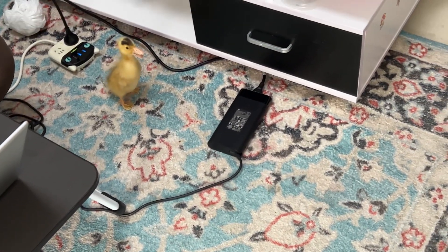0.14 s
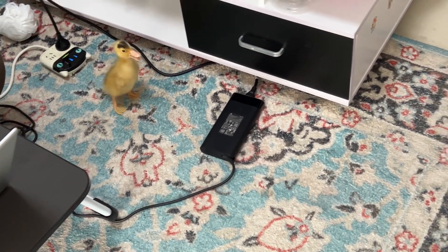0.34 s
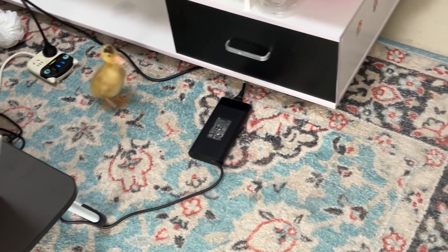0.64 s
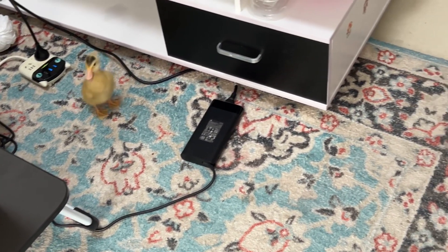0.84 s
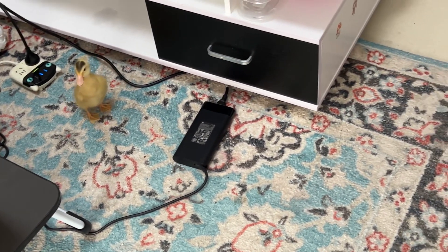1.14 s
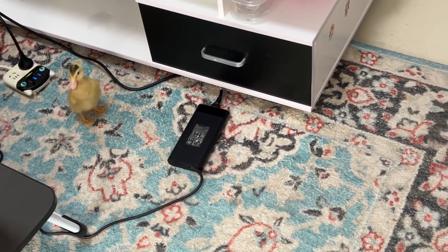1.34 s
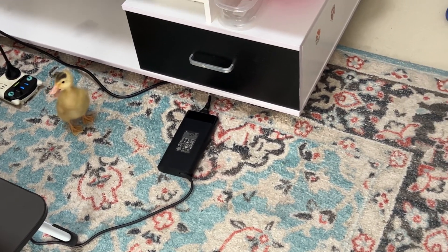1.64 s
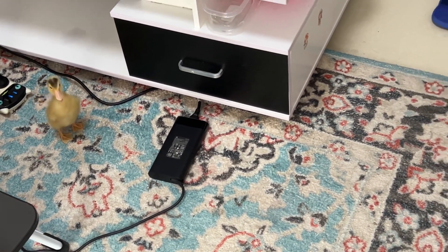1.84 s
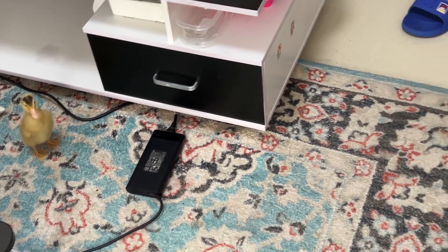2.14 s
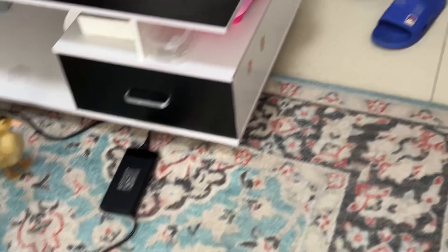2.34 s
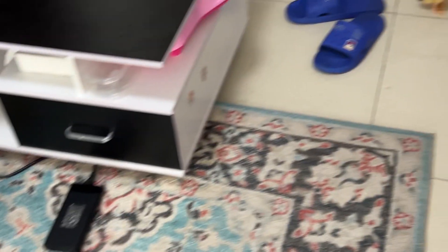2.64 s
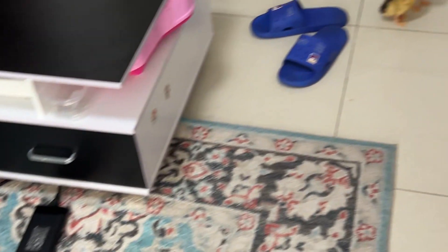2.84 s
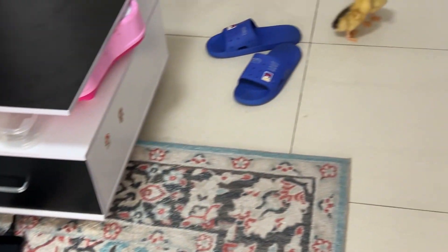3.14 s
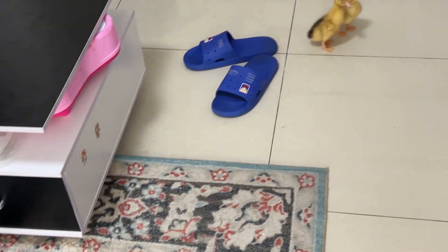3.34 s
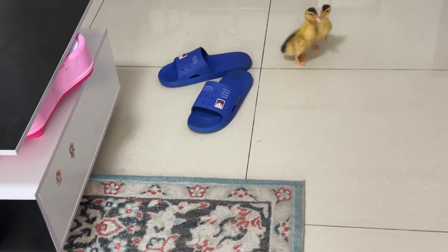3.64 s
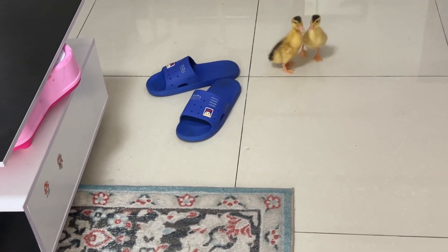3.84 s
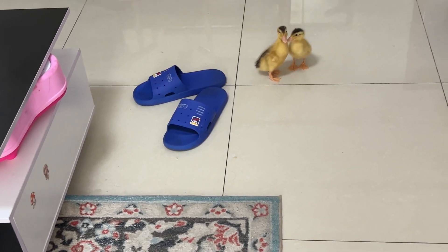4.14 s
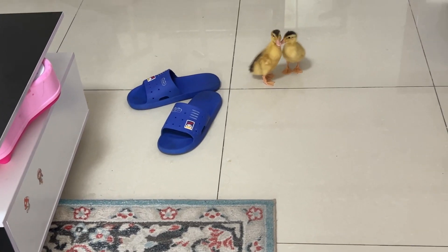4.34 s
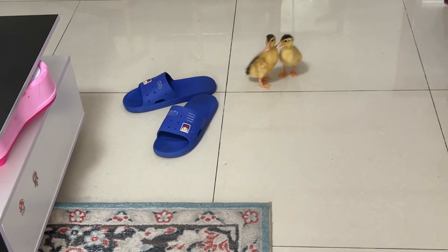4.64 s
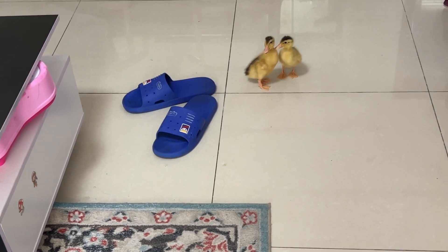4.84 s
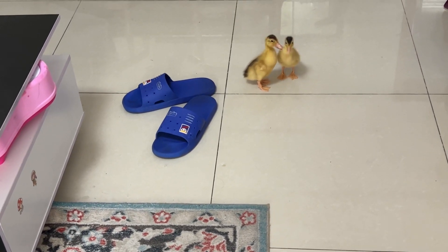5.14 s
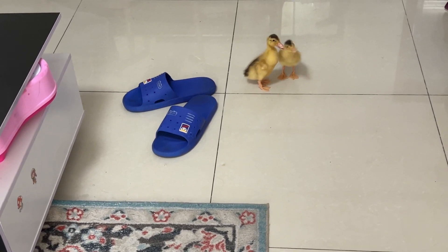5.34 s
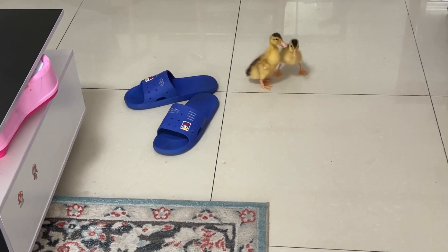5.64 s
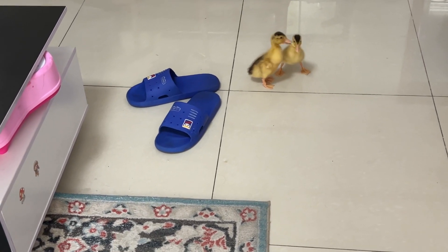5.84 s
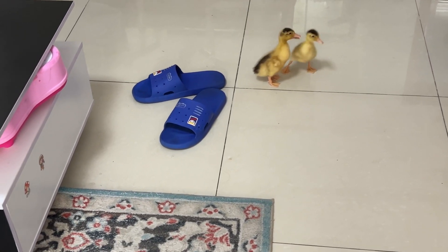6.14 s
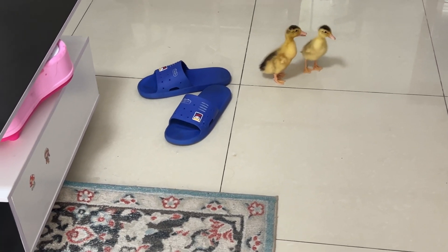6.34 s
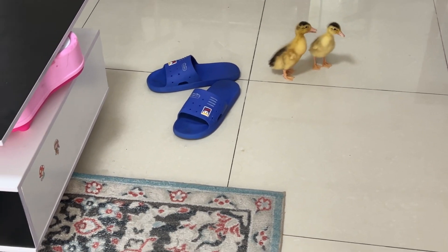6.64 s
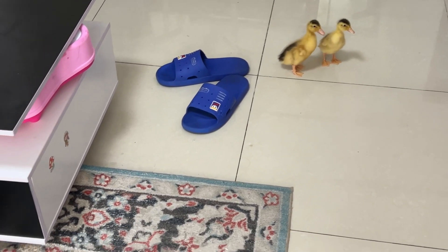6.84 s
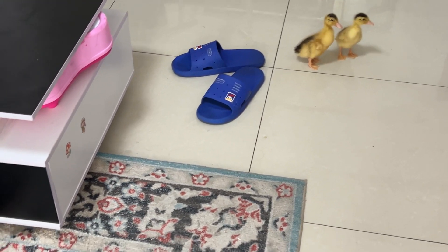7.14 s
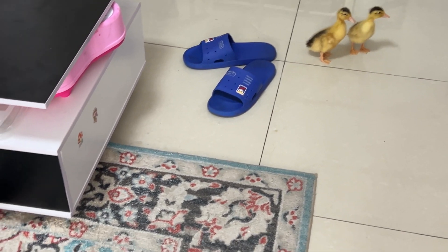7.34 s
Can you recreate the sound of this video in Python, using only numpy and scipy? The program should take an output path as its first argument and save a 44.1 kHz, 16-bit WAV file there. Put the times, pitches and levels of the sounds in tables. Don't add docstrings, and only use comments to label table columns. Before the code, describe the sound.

A quiet living room with a low, soft rumbling hum that swells as the phone is moved. From 0 to 2.8 seconds a near duckling gives separate, piercing peeps of just over a tenth of a second, swooping up, holding near 3.4 kHz, rising, then dropping fast; several crack upward with a rasp, the longest and highest near 2.5. Quiet dipping peeps from another bird fall between them. From 2.9 the farther duckling calls regularly, about four per second, each peep sliding downward with two clashing voices, while the near one alternates until 4.4. From 4.5 to 6.2 only the falling peeps continue; then the near bird returns, flatter at first, interleaving until the far one stops around 6.7. Near peeps close the clip at 7.4. Dull low handling bumps occur near 0.5, 2.4, 2.8 and 3.7 to 4.9, a faint claw scuff at 4.3. Hard surfaces ring for roughly half a second.

```python
import sys
import numpy as np
from scipy import signal
from scipy.fft import rfft, irfft, next_fast_len
from scipy.io import wavfile
from scipy.ndimage import uniform_filter1d

SR = 44100
rng = np.random.default_rng(int(sys.argv[2]) if len(sys.argv) > 2 else 0)


def dump(signal):
    limited = np.clip(np.atleast_2d(signal).T, -1, 1)
    pcm = np.round(limited * 32767).astype(np.int16)
    wavfile.write(sys.argv[1], SR, pcm)


N = 329868
LEAD = SR // 4
PADDED = N + 2 * LEAD


def from_db(db):
    return 10 ** (np.asarray(db) / 20)


def at_hz(points, hz):
    points = np.array(points)
    return np.interp(np.log(np.maximum(hz, 1)), np.log(points[:, 0] + 1), points[:, 1])


def wobble(count, hz):
    r = np.exp(-2 * np.pi * hz / SR)
    slow = signal.lfilter([1], [1, -2 * r, r * r], rng.standard_normal(count + 3000))[3000:]
    return slow / slow.std()


# frequency in Hz, density in dB per Hz.
HUM_SPECTRUM = [(22, -25.5), (45, -1), (100, -3.5), (130, -11.5), (250, -16), (550, -22.5), (750, -29),
                (1050, -26), (1500, -30.5), (2200, -25.5), (2800, -34), (4000, -45), (5000, -57),
                (8000, -91)]
# frequency in Hz, typical peak level in dB.
APPLIANCE_TONES = [(54, -61.5), (196, -74), (240, -77.5), (300, -80), (344, -80), (538, -80.5)]
# frequency in Hz, left-right likeness from -1 to 1.
PORT_LIKENESS = [(60, 0.92), (130, 0.942), (290, 0.65), (640, 0.54), (1410, 0.082), (3100, 0.85),
                 (6820, -0.36), (15000, 0.21)]
# peak time in seconds, lift in dB.
RUMBLE_SWELLS = [
    (.9, 3.5),
    (1.95, 1.5),
    (2.42, 5),
    (2.9, 1.5),
    (3.9, 3.5),
    (4.32, 4),
    (5.7, 2),
    (7.3, 3),
]


def hum():
    hz, t = np.fft.rfftfreq(N, 1 / SR), np.arange(N) / SR
    mid, side = rfft(rng.standard_normal((2, N))) * from_db(at_hz(HUM_SPECTRUM, hz))
    alike = np.clip(at_hz(PORT_LIKENESS, np.minimum(hz, 1400)), -1, 1)
    noise = irfft(np.sqrt(1 + alike) * mid + np.sqrt(1 - alike) * side * [[1], [-1]], N)
    hum_db, swell_s = -67, 0.2246
    swell_db = sum(db * np.exp(-((t - s) / swell_s) ** 2) for s, db in RUMBLE_SWELLS)
    noise *= from_db(hum_db + swell_db + 8.5 + 1.6 * wobble(N, 2.0)) / noise.std()
    flicker_db, drift_hz = 4.5, 4.038
    for tone_hz, db in APPLIANCE_TONES:
        level = from_db(db + flicker_db * wobble(N, 1.9))
        phase = 2 * np.pi * np.cumsum(tone_hz + drift_hz * wobble(N, 4.9)) / SR
        noise = noise + level * np.sin(phase)
    return noise


# start in seconds, peak level in dB.
FINGER_THUDS = [
    (0.47, -54),
    (2.372, -47.5),
    (2.821, -48),
    (3.662, -49),
    (3.986, -53.5),
    (4.374, -48.5),
    (4.873, -52),
]


def thuds():
    out, t = np.zeros(N + SR), np.arange(SR // 5) / SR
    bump = np.sin(2 * np.pi * 62 * t) * (t / 0.00995) * np.exp(-t / 0.018)
    for s, db in FINGER_THUDS:
        out[round(s * SR):][:len(t)] += from_db(db + 8.0) * bump
    return out[:N]


# frequency in Hz, gain in dB.
BEAK_ROOM_COLOUR = [(1400, -4.5), (2200, -11), (3300, -2.5), (4200, -3.5), (5100, -4), (6600, -4.5),
                    (7050, -17.5), (7450, -11.5), (8200, -8), (10000, 2), (11500, 3), (12500, -18),
                    (13300, -2), (15600, -8)]
# frequency in Hz, time to fall 60 dB in seconds.
ROOM_DECAY = [(1500, 0.41), (3400, 0.4532), (6500, 0.3635), (10000, 0.2764), (15000, 0.15)]
# frequency in Hz, radians by which the left leads.
PORT_LEAD = [(0, 0), (600, -0.3), (1460, 1.8), (2670, -0.6), (5080, -0.1), (5430, 2.1), (6370, 2.0),
             (7490, 3.3), (8350, 5.9), (9820, 6.5), (10900, 7.6), (11800, 9.1), (13700, 9.9), (15400, 12.8)]


def living_room(dry, wet_db, own_db):
    size = next_fast_len(len(dry) + SR)
    hz, t = np.fft.rfftfreq(size, 1 / SR), np.arange(SR) / SR
    tail = np.zeros((2, SR))
    for centre in np.geomspace(1500, 15000, 6):
        edges = [centre / 10 ** .1, centre * 10 ** .1]
        band = signal.butter(2, edges, "band", fs=SR, output="sos")
        decay = from_db(-60 * t / at_hz(ROOM_DECAY, centre))
        tail += signal.sosfilt(band, rng.standard_normal((2, SR))) * decay
    tail *= 1 - np.exp(-t / 0.0007)
    shared, own = rfft(tail / np.sqrt(np.sum(tail[0] ** 2)), size)
    side = np.array([[1], [-1]])
    path = 1 + from_db(wet_db) * (shared + from_db(own_db) * own * side)
    ports = from_db(at_hz(BEAK_ROOM_COLOUR, hz)) * np.exp(.5j * side * at_hz(PORT_LEAD, hz))
    return irfft(rfft(dry, size) * path * ports, size)[:, LEAD:LEAD + N]


# start in seconds, peak level in dB.
CLAW_TAPS = [
    (4.292, -45.5),
]


def claw_tap():
    out = np.zeros(PADDED)
    burst = np.exp(-np.arange(3000) / 900)
    for s, db in CLAW_TAPS:
        out[round(s * SR) + LEAD:][:3000] = from_db(db + 9.5) * rng.standard_normal(3000) * burst
    return signal.sosfilt(signal.butter(2, [280, 2600], "band", fs=SR, output="sos"), out)


def whistle(out, knots, overtones_db, rough, opening=0.0044):
    s, hz, db = np.transpose(knots)
    at = np.arange(round(s[0] * SR), round(s[-1] * SR))
    pitch = uniform_filter1d(np.interp(at / SR, s, hz), size=177, mode="nearest")
    pitch *= 1 + 0.0021 * wobble(len(at), 22)
    tremble = 1 + rough * wobble(len(at), 4000 * rough + 230)
    phase = 2 * np.pi * np.cumsum(pitch * tremble) / SR
    opened = np.minimum(1, (at - at[0]) / SR / opening) ** 2
    shutting = np.minimum(1, pitch / 2743) ** 12
    tone = np.sin(phase) * from_db(overtones_db[0])
    for harmonic, overtone_db in enumerate(overtones_db[1:], 2):
        tone += opened * shutting * from_db(overtone_db) * np.sin(harmonic * phase)
    edge = np.minimum(1, np.minimum(at - at[0], at[-1] - at) / 90)
    out[at + LEAD] += np.sqrt(2) * from_db(np.interp(at / SR, s, db)) * edge * tone


def shifted(shape, s, db):
    return [(s + t, hz, db + rel) for t, hz, rel in shape]


# start in seconds, high Hz, low Hz, drop after start in seconds, level in dB.
FAR_PEEPS = [(2.88, 3601, 3118, 0.0344, -33), (3.168, 3548, 3090, 0.0548, -27.5),
             (3.442, 3485, 2988, 0.0695, -28.5), (3.707, 3452, 3120, 0.0725, -25),
             (3.971, 3563, 3056, 0.0843, -28.5), (4.229, 3456, 3205, 0.0854, -27.5),
             (4.495, 3568, 3228, 0.1018, -27.5), (4.751, 3558, 3237, 0.11, -28),
             (5.017, 3525, 3159, 0.112, -28.5), (5.278, 3469, 3167, 0.1017, -28.5),
             (5.546, 3523, 3195, 0.095, -27), (5.812, 3514, 3141, 0.0997, -28),
             (6.083, 3562, 3164, 0.1103, -30.5), (6.358, 3509, 3227, 0.1076, -29.5),
             (6.629, 3534, 3121, 0.0912, -28)]


def far_two_voiced(out):
    for s, high_hz, low_hz, after, db in FAR_PEEPS:
        second_rel = -6.5 - 338 * max(0, 0.0878 - after)
        second_db = db + second_rel
        whistle(out, shifted([(-.036, 1950, -42.5), (-.031, 2300, -27.5), (-.024, 3000, -37.5)], s, db),
                [0], rough=0.0061)
        main = [(-.016, 4450, 1.2 * second_rel - 28), (-.010, 4300, 1.8 * second_rel - 14),
                (-.004, 1.03 * high_hz, -17), (.002, high_hz, -4),
                (.019, .995 * high_hz, 0.5), (.04, 1.035 * low_hz, -4),
                (after - .016, low_hz, -13), (after - .004, .94 * low_hz, -19),
                (after + 0.0033, 0.78 * low_hz, -26), (after + 0.0097, 1950, -34)]
        whistle(out, shifted(main, s, db), [1, -16, -34.5, -37.5], rough=rng.uniform(.004, .008), opening=0.05)
        bend = 1 + 0.023 * rng.standard_normal()
        second = [(-.003, 4700 * bend, -21.5), (.007, 4280 * bend, -2), (.019, 3930, 2.5), (.03, 3800 / bend, -15)]
        whistle(out, shifted(second, s, second_db), [0, -22, -34], rough=.022, opening=0.005)
        rasp = [(-.006, 4500, -22.5), (.006, 4700, -24), (0.05, 4500, -31.5)]
        whistle(out, shifted(rasp, s, second_db), [0, -14, -30], rough=0.24)
        for times, mix_db in ((1, -20), (2, -23), (3, -34)):
            mixed = [(t - .005, hz + times * high_hz, rel + mix_db - 8.5) for t, hz, rel in second]
            whistle(out, shifted(mixed, s, second_db), [0], rough=0.037)


# lowest point in seconds, closing drop in seconds, lowest Hz, level in dB,
# entry level in dB.
FAR_SOFT_PEEPS = [
    (0.118, 0.011, 2864, -42.5, -47),
    (1.495, .007, 2724, -42.5, -67),
    (1.809, .007, 2879, -41, -47.5),
    (2.258, 0.006, 2807, -40, -49),
    (2.559, .04, 2914, -40, -37),
]


def far_soft(out):
    dip_s, dip_share = .04, 1.14
    for s, drop, hz, db, entry_db in FAR_SOFT_PEEPS:
        hold = .068 - drop / 2
        rebound = .045 * np.clip(3 + (entry_db - db + 8.5) / 15, 0, 1)
        knots = [(s - dip_s - .015, 1.15 * dip_share * hz, entry_db - 18),
                 (s - dip_s, dip_share * hz, entry_db), (s, hz, db),
                 (s + .035, (1 + rebound) * hz, db - 4.5),
                 (s + hold, (1 + .7 * rebound) * hz, db),
                 (s + hold + drop, 0.68 * hz, db - 10)]
        whistle(out, knots, [1.0, -13.0, -30, -41.5, -38.5], rough=.006)


def far_duckling():
    out = np.zeros(PADDED)
    far_two_voiced(out)
    far_soft(out)
    return out


# time in seconds, depth in dB.
ECHO_NULLS = [(0.188, 8.5), (0.548, 14.5), (1.344, 12.5), (1.577, 10), (2.432, 14.5), (2.886, 13.5),
              (6.295, 19), (6.856, 8), (7.19, 12)]


def held_note(s, length, shelf_hz, last_hz, db, pause, cracks):
    land = .85 if pause > .6 else 0.9602 - 0.506 * (last_hz / shelf_hz - 1)
    settle_s, crest_s = 0.013827, 0.04712
    settled = land + 0.4469 * (1 - land)
    t, climb = np.linspace(0, length, num=40), max(crest_s + .004, length - .056)
    hz = np.interp(t, [0, settle_s, crest_s, climb, length],
                   [land * shelf_hz, settled * shelf_hz, shelf_hz, 0.9892 * shelf_hz, last_hz])
    hz[2:-2] = uniform_filter1d(hz, size=5)[2:-2]
    swell_db = 3.5 * cracks
    level = db + np.interp(t, [0, settle_s, 0.0507, climb, length - .02, length],
                           [-13.5, -3.5, 0, 0, swell_db, swell_db - 2.5])
    null_s = .01
    level -= sum(depth_db * np.exp(-((s + t - at) / null_s) ** 2) for at, depth_db in ECHO_NULLS)
    return list(zip(s + t, hz, level))


# time in seconds, top Hz, level in dB, delay of the drop in
# seconds, half-pitch rasp in dB.
VOICE_CRACKS = [
    (0.241, 4246, -26, .013, -59),
    (0.615, 4051, -25, .012, -61),
    (0.924, 3636, -50.5, 0.0059, -71.5),
    (1.364, 4403, -28.5, 0.019, -51.5),
    (2.467, 5266, -25.5, 0.05, -54),
    (4.121, 4282, -33.5, 0.015, -59.5),
]


def voice_cracks(out):
    for s, top_hz, db, _, rasp_db in VOICE_CRACKS:
        crack = [(s - .005, 3620, db + 4.5), (s, 3800, db),
                 (s + 0.01, top_hz, db - 9.5), (s + 0.016, .97 * top_hz, db - 13.5)]
        whistle(out, crack, [0], rough=.03)
        whistle(out, crack, [-61.5, -20.0, -29.5, -53.5], rough=0.062)
        breath = [(-.004, 5300, -1.0), (.004, 5400, 4), (0.025, 5000, -6.5)]
        whistle(out, shifted(breath, s, rasp_db), [0], rough=0.13)
        half_pitch = [(-.002, 1550, -10.5), (0.0032, 1520, 0), (0.06, 1450, -20)]
        whistle(out, shifted(half_pitch, s, rasp_db), [0], rough=0.21)


# start in seconds, length in seconds, shelf Hz, last Hz, level in dB.
NEAR_PEEPS = [(-.2, 0.1285, 3326, 3702, -29), (0.111, 0.1285, 3351, 3708, -28.5),
              (0.481, 0.1298, 3339, 3700, -28.5), (0.791, 0.1319, 3367, 3549, -27),
              (1.239, 0.11965, 3336, 3643, -23.5), (1.549, .14, 3388, 3530, -28),
              (2.349, .112, 3299, 3526, -27.5), (2.765, 0.1411, 3274, 3413, -26.5),
              (3.057, 0.1396, 3372, 3507, -27.5), (3.36, 0.151, 3442, 3572, -31.5),
              (3.667, 0.1396, 3373, 3430, -29), (3.982, 0.1306, 3348, 3578, -27.5),
              (4.304, .132, 3354, 3455, -25.5), (6.211, 0.1208, 3045, 3019, -31),
              (6.496, 0.1184, 3252, 3182, -31.5), (6.786, 0.1202, 3286, 3361, -28.5),
              (7.077, 0.12955, 3355, 3422, -27.5), (7.379, 0.1004, 3372, 3450, -27.5)]
# time in seconds, overtone lift in dB, left minus right in dB.
BEAK_FACING = [(0, 0, 0.5), (0.801, -2.5, 0.8), (1.303, -7, 0), (1.701, 2, 1), (2.4, 1.5, 0.5),
               (2.897, -5, 1.5), (3.497, 3.5, 1.38), (4.202, -4.5, 1.5), (6.3, 1, 1), (6.8, 1, 1.5),
               (7.48, 0, 0.9)]


def near_duckling():
    out = np.zeros(PADDED)
    when, lifts_db, _ = np.transpose(BEAK_FACING)
    for peep, before in zip(NEAR_PEEPS, NEAR_PEEPS[:1] + NEAR_PEEPS):
        end = peep[0] + peep[1]
        wait = sum(crack[3] for crack in VOICE_CRACKS if abs(crack[0] - end) < .035)
        held = held_note(*peep, pause=peep[0] - before[0], cracks=wait > .01)
        (s0, hz0, db0), (s1, hz1, db1) = held[0], held[-1]
        spent_db = db1 - 300 * wait
        swoop = [(s0 - .012, 0.65 * hz0, db0 - 11), (s0 - .007, .88 * hz0, db0)]
        drop = [(0.002, min(hz1, 3380), -0.5), (0.0058, 2850, 3.5), (0.01589, 2050, -13.0)]
        knots = swoop + held + shifted(drop, s1 + wait, spent_db)
        lift_db = np.interp(s0, when, lifts_db) * np.array([0.3, 1.7, 1.8, 1.3])
        whistle(out, knots, np.array([2, -15, -30, -39]) + lift_db, rough=0.003, opening=0.014)
        overshoot = [(.003, 4250, -26), (.008, 3900, -23), (.016, 3650, -27)]
        whistle(out, shifted(overshoot, s0, db0), [0], rough=.06)
    voice_cracks(out)
    return out


def scene():
    when, _, pans_db = np.transpose(BEAK_FACING)
    pan_db = np.interp(np.arange(N) / SR, when, pans_db) * [[.5], [-.5]]
    far = living_room(far_duckling(), wet_db=-5, own_db=-15.0) * from_db([[.15], [-.15]])
    near = living_room(near_duckling() + claw_tap(), wet_db=-8.0, own_db=-11.5) * from_db(pan_db)
    return hum() + thuds() + far + near


def low_pass(x):
    return signal.sosfilt(signal.butter(12, 15840, fs=SR, output="sos"), x)


def record(dry):
    return low_pass(dry)


dry = scene()
out = record(dry)
dump(out)
```